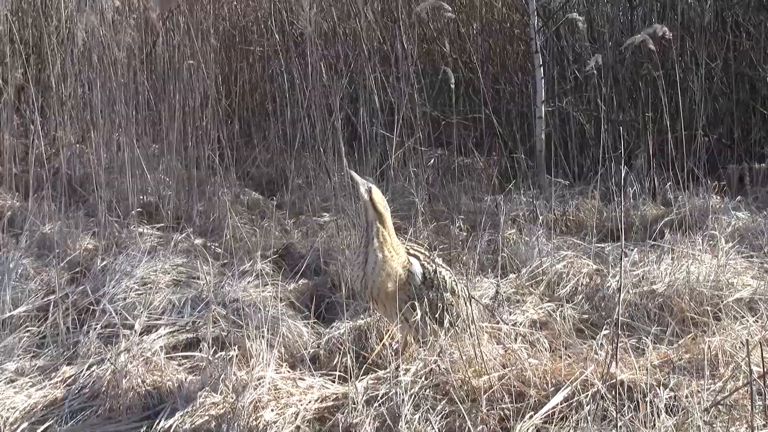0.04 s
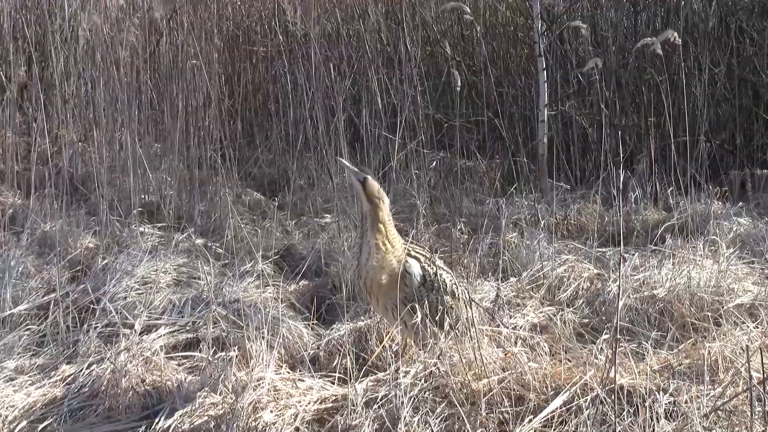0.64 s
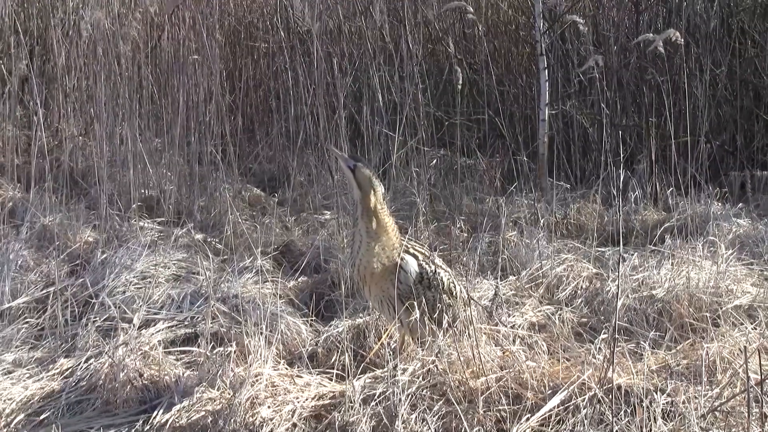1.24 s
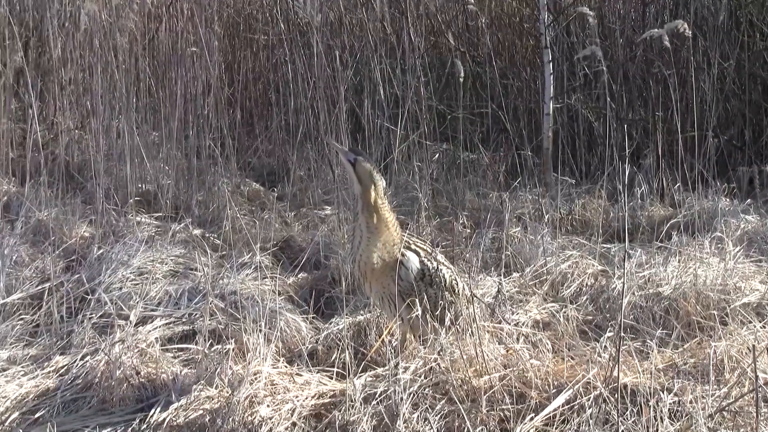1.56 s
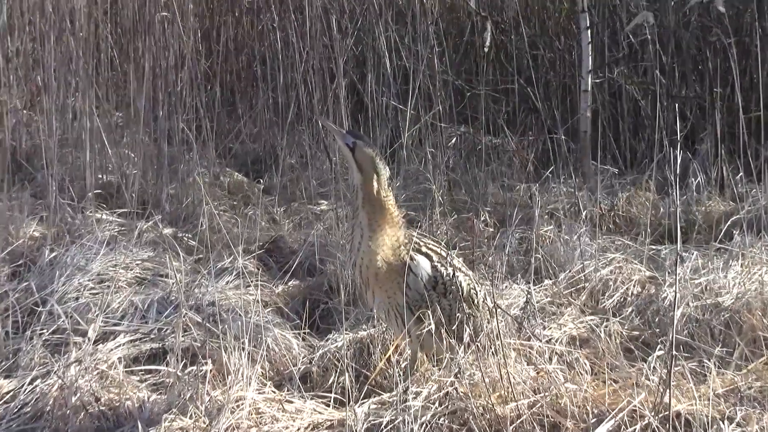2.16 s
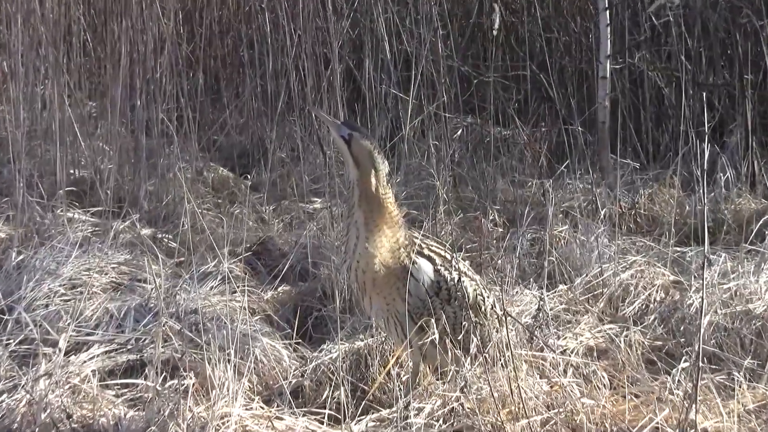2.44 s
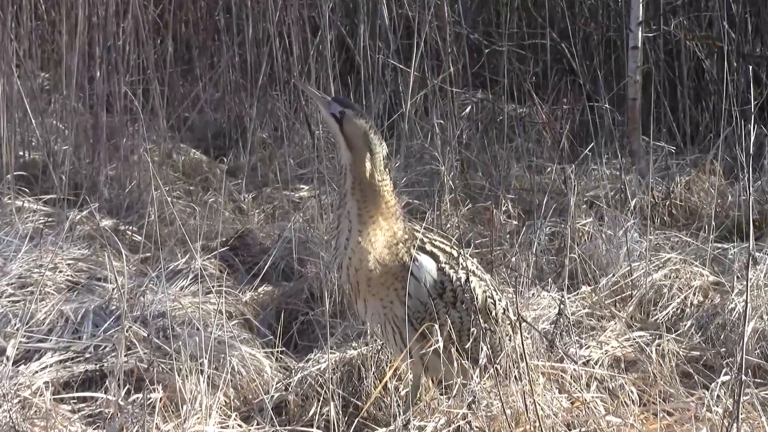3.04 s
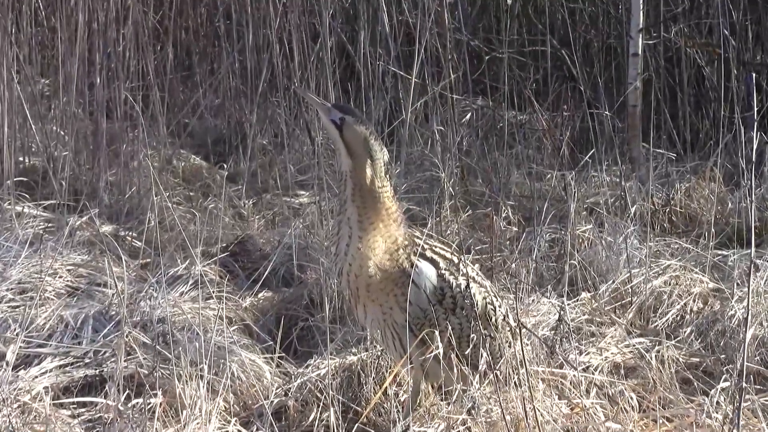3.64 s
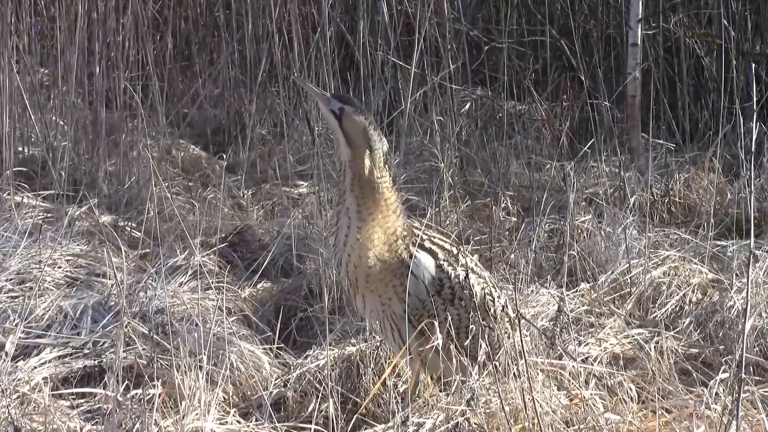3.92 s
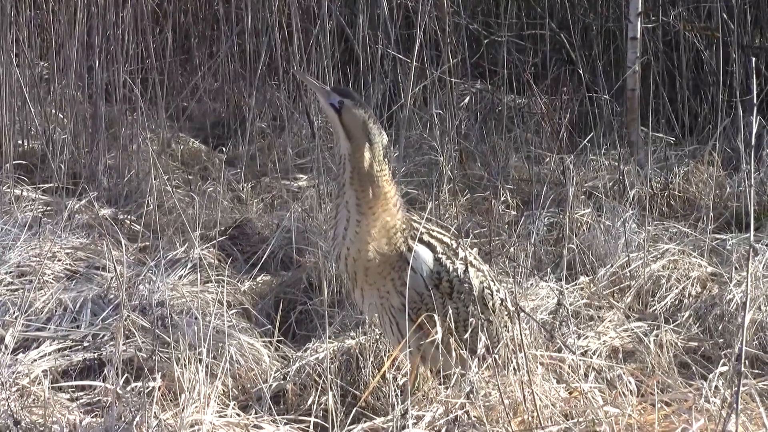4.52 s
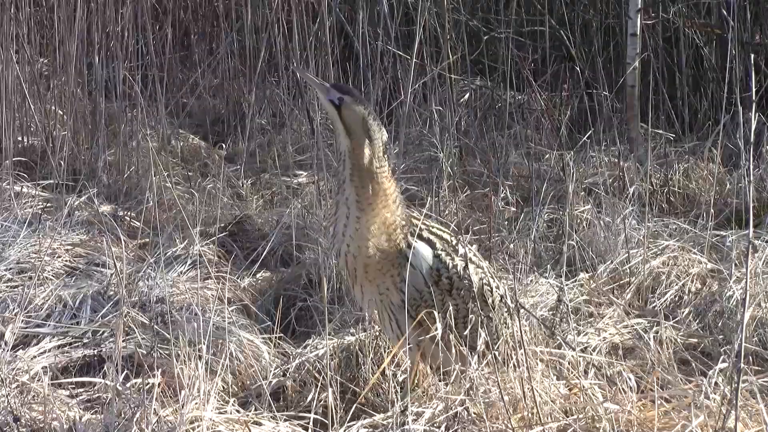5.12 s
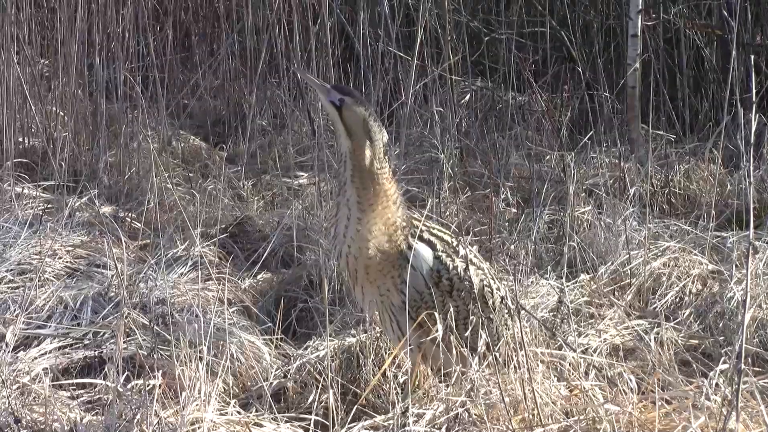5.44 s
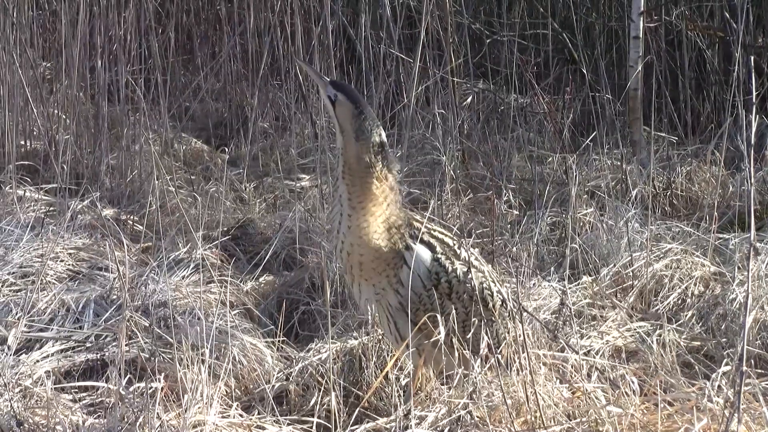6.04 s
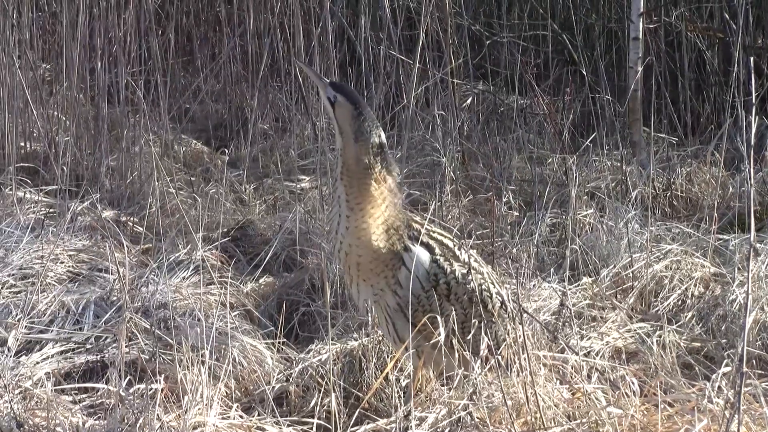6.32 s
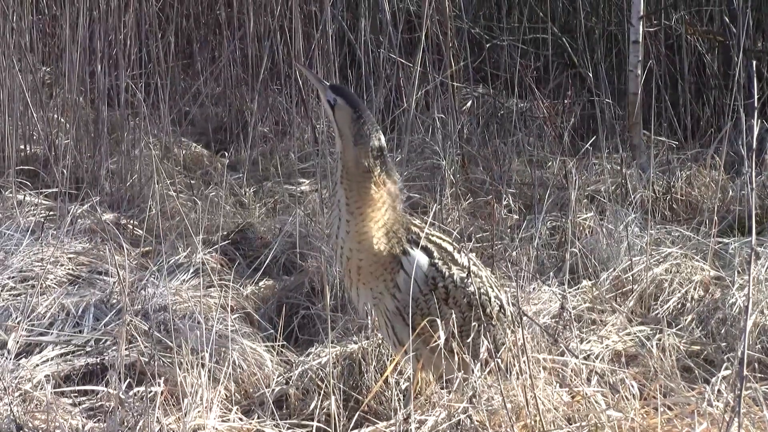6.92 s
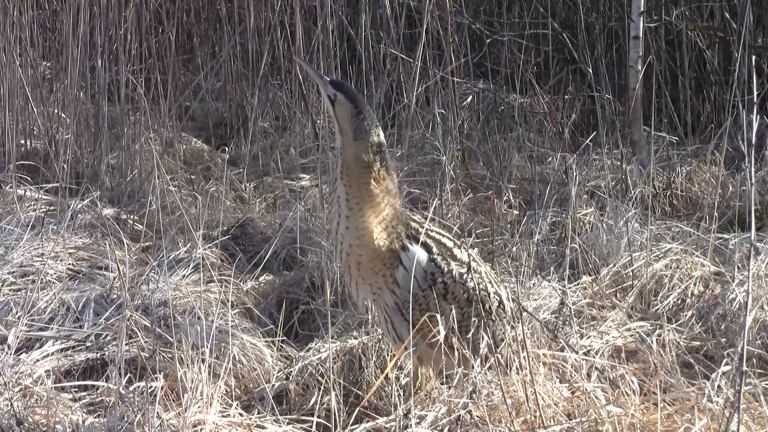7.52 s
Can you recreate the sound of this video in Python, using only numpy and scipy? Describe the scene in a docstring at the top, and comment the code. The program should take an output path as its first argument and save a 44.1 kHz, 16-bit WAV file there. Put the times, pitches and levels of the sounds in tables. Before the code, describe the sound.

Light breeze through dry reeds under faint hiss; plastic clicks and hollow knocks early on, later a sharp reed snap.

```python
"""Reed bed in light wind

Low wind eases to a lull under steadily rustling reeds, heard from a hand-held camera that hisses faintly.
Fingers work its small plastic lever and knock on its hollow shell; both ring in short-lived modes.
Dry grass ticks and reeds crack in runs of splinters. Far off, small birds whistle a few faint notes
and a thin whine swells and fades."""
import sys
import numpy as np
from scipy import signal
from scipy.fft import rfft, irfft, next_fast_len
from scipy.io import wavfile
from scipy.ndimage import uniform_filter1d

SR = 44100
rng = np.random.default_rng(int(sys.argv[2]) if len(sys.argv) > 2 else 0)


def to_wav(s):
    """Save 16-bit WAV."""
    ch = np.atleast_2d(s).T  # columns
    pcm = np.round(np.clip(ch, -1, 1) * 32767)  # PCM
    wavfile.write(sys.argv[1], SR, pcm.astype(np.int16))


N = 343098


def amp(db):
    """Decibels to gain."""
    return 10 ** (np.asarray(db) / 20)


def unit(x):
    """x at rms 1."""
    return x / np.sqrt(np.mean(x ** 2) + 1e-20)


def along(points, hz):
    """Read a curve of (f/Hz, value) points on a log frequency axis."""
    f, v = np.transpose(points)
    return np.interp(np.log(hz + 1), np.log(f + 1), v)


def filtered(x, response):
    """EQ x with a gain given as a function of frequency."""
    size = next_fast_len(x.shape[-1] + SR // 2)
    gain = response(np.fft.rfftfreq(size, 1 / SR))
    return irfft(rfft(x, size) * gain, size)[..., :x.shape[-1]]


def low_cut(x, hz):
    """A small body radiates little below hz."""
    return signal.sosfilt(signal.butter(2, hz, "high", fs=SR, output="sos"), x)


def add(track, s, sound):
    """Mix a sound into the track from time s."""
    part = track[:, round(s * SR):][:, :sound.shape[-1]]
    part += sound[..., :part.shape[-1]]


def panned(x, left_db):
    """A mono sound, louder on the left by left_db."""
    return x * amp([[left_db / 2], [-left_db / 2]])


def impulse(spectrum, size=1024):
    """The tightest click with this EQ curve (minimum phase)."""
    magnitude = amp(along(spectrum, np.fft.rfftfreq(size, 1 / SR)))
    cepstrum = irfft(np.log(magnitude))
    causal_fold = 1 + np.sign(np.fft.fftfreq(size))
    return irfft(np.exp(rfft(cepstrum * causal_fold)))


def ring(modes, tilt_db, skew_rad):
    """Struck modes die away, tilted by tilt_db per octave, with left and right skew_rad out of phase."""
    t = np.arange(SR // 5) / SR
    phase = np.array([[skew_rad], [-skew_rad]]) / 2
    out = np.zeros((2, len(t)))
    for hz, t60, left_db, right_db in modes:
        level_db = np.array([[left_db], [right_db]]) + tilt_db * np.log2(hz / 2000) + rng.normal(0, 1)
        out += amp(level_db - 60 * t / t60) * np.sin(2 * np.pi * hz * t + phase)
    attack = 1 - np.exp(-t / 0.00014)
    return out * attack


def scatter(x, t60, length_s=0.5):
    """A diffuse reverb tail at about unity gain, different in each channel."""
    t = np.arange(int(length_s * SR)) / SR
    tail = rng.standard_normal((2, len(t))) * amp(-60 * t / t60)
    return signal.fftconvolve(x, tail / np.linalg.norm(tail[0]), axes=1)[:, :x.shape[-1]]


# Stereo width of the noise beds: f/Hz, side minus mid/dB
BED_WIDTH = [(60, -5.5), (110, -3.5), (200, 3.5), (380, 6.5), (700, 4.5), (1290, 0.5), (2380, -2),
             (4400, -4), (8120, -1), (15000, -1)]

def rush(spectrum, patchy_db=1.0, side_db=0.5):
    """A stereo noise bed of rms 1 whose gain wavers in patches across time and frequency."""
    def mid_side_eq(hz):
        angle = np.arctan(amp(along(BED_WIDTH, hz) + side_db))
        return amp(along(spectrum, hz)) * np.array([np.cos(angle), np.sin(angle)])

    bins = signal.stft(rng.standard_normal((2, N)), nperseg=512)[2]
    patches = uniform_filter1d(rng.standard_normal(bins.shape[1:]), size=6, axis=0)
    patches = unit(uniform_filter1d(patches, size=18, axis=1))
    noise = signal.istft(bins * amp(patchy_db * patches), nperseg=512)[1][:, :N]
    mid, side = filtered(noise, mid_side_eq)
    return unit(np.array([mid + side, mid - side]))


# Low body of the wind: f/Hz, relative level/dB
WIND_EQ = [(20, -18), (60, -15), (110, -9), (170, -4), (260, 0.5), (390, -0.5), (650, -9.5), (1500, -33.5)]

def wind(breeze_db=-48.5, lull_db=-54, ease_start_s=1.96, ease_s=2.9):
    """A low breeze blows, then eases into a lull."""
    level_db = np.interp(np.arange(N) / SR, [ease_start_s, ease_start_s + ease_s], [breeze_db, lull_db])
    return amp(level_db) * rush(WIND_EQ, patchy_db=1.06)


# Soft midrange of the rustle: f/Hz, relative level/dB
RUSTLE_EQ = [(150, -26), (350, -2), (520, 0.5), (830, -1.5), (1200, -5.5), (2100, -11), (4700, -17.5),
             (8000, -30), (15000, -33)]

def reed_rustle():
    """Reeds rustle steadily in the wind."""
    return amp(-50) * rush(RUSTLE_EQ)


# Bright noise floor: f/Hz, relative level/dB
HISS_EQ = [(500, -3.5), (3000, -2.5), (6000, 2.5), (10000, -1), (16000, -3.5)]

def microphone_hiss():
    """The microphone's own faint, even hiss."""
    return amp(-60) * rush(HISS_EQ)


# Plastic snap, the attack of both lever and knocks: f/Hz, relative level/dB
SNAP_EQ = [(100, -17), (600, 5), (1300, 5), (2200, -1), (3000, 1), (4500, 1.5), (5700, -4), (7200, -13.5),
           (10000, -14), (15000, -18.5)]
# Ring of the lever: f/Hz, t60/s, left level/dB, right level/dB
LEVER_MODES = [(840, 0.032, -6, -4.5), (1145, 0.017, -2, -1), (1680, 0.015, -4.5, -7),
               (2070, 0.032, -11, -11), (2450, 0.015, -7.5, -7), (3550, 0.0092, -6.5, -7),
               (5250, 0.0031, -25, -14), (7300, 0.0041, -22, -18), (8700, 0.0048, -24.5, -23)]
# Lever hits: t/s, level/dB, brightness/(dB per octave)
LEVER_HITS = [(0.2542, -46.5, -10), (0.2978, -31, 3), (0.2988, -23.5, 5.5), (0.3025, -18.5, 6),
              (0.3076, -27, 6), (0.3109, -35, 0), (4.427, -37.5, 0.5)]

def lever():
    """The plastic lever chatters against its stops: each contact clicks and rings."""
    out = np.zeros((2, N))
    for s, db, bright_db in LEVER_HITS:
        clack = amp(db) * ring(LEVER_MODES, tilt_db=bright_db, skew_rad=0.16)
        add(out, s, clack + amp(-10) * scatter(clack, t60=0.026))
        click = scatter(impulse(SNAP_EQ)[None], t60=0.0042)
        add(out, s, amp(db + 14) * click)
    return low_cut(out, hz=180)


# Hollow ring of the camera's shell: f/Hz, t60/s, left level/dB, right level/dB
SHELL_MODES = [(156, 0.1, -21.5, -18), (330, 0.054, -17, -18), (383, 0.042, -7, -3.5),
               (488, 0.026, -21, -8), (580, 0.036, -13, -10), (637, 0.046, -30, -3.5),
               (790, 0.029, -0.5, -7.5), (865, 0.016, -29, -10), (1220, 0.027, -15, -19),
               (1400, 0.016, -17, -11), (1675, 0.032, -23, -15)]
# Finger hits: t/s, thud level/dB
FINGER_HITS = [(0.2687, -34.5), (0.458, -43.5), (0.584, -34), (0.588, -35.5), (0.6656, -19), (1.2617, -16),
               (2.375, -49), (5.70, -44)]

def knocks(hard_hit_db=-15.5):
    """Fingers hit the shell: a snap to the right, a hollow thud. Soft hits are duller and barely snap."""
    out = np.zeros((2, N))
    snap = panned(low_cut(impulse(SNAP_EQ), hz=300), left_db=-7.5)
    for s, db in FINGER_HITS:
        force_db = db - hard_hit_db
        shell = ring(SHELL_MODES, tilt_db=0.12 * force_db, skew_rad=0.93)
        thud = low_cut(amp(db) * shell, hz=182)
        add(out, s, thud + amp(-14) * low_cut(scatter(thud, t60=0.3), hz=99))
        add(out, s, amp(3.5 + 1.65 * force_db) * snap)
    return out


# Crisp top of a grass tick: f/Hz, relative level/dB
TICK_EQ = [(1000, -28), (4000, -2), (8000, 5), (15000, -3.5)]
# Tick cues: t/s, level/dB
TICK_CUES = [(0.383, -35), (1.772, -30), (7.254, -36)]

def grass_ticks():
    """Thin dry grass gives single bright clicks on the right."""
    out = np.zeros((2, N))
    for s, db in TICK_CUES:
        add(out, s, amp(db) * panned(impulse(TICK_EQ), left_db=-12))
    return out


# Whistles: t/s, length/s, f/Hz, upward scoop/fraction of f, level/dB
BIRD_NOTES = [(0.5, 0.08, 3040, 0, -55.5), (1.295, 0.064, 4360, 0.078, -55.5),
              (1.448, 0.058, 4330, 0.068, -56), (7.559, 0.04, 4640, 0, -63)]

def birds(scoop_s=0.018, sag_hz_per_s=1750):
    """Pure notes, some scooping up at first, sag in pitch and echo from the edge of the wood."""
    out = np.zeros((2, N))
    for s, length, hz, scoop, db in BIRD_NOTES:
        t = np.arange(int(length * SR)) / SR
        scoop_left = np.maximum(1 - t / scoop_s, 0)
        pitch = hz * (1 - scoop * scoop_left) - sag_hz_per_s * t
        tone = np.sin(2 * np.pi * np.cumsum(pitch) / SR)
        note = panned(amp(db) * signal.windows.tukey(len(t), 0.5) * tone, left_db=-3)
        add(out, s, note)
        add(out, s + 0.042, amp(-13) * note)  # slapback
    return out + amp(-11) * scatter(out, t60=0.45)


# Narrow band of the whine: f/Hz, relative level/dB
WHINE_EQ = [(900, -50), (1300, -2), (1450, -2), (1650, -9), (2200, -50)]

def whine(peak_s=0.637, peak_db=-55.5, rise_db_per_s=320, fade_db_per_s=26):
    """A far-off band of noise swells quickly and fades slowly."""
    t = np.arange(N) / SR - peak_s
    level_db = peak_db + np.minimum(rise_db_per_s * t, -fade_db_per_s * t)
    return amp(level_db) * rush(WHINE_EQ, patchy_db=-0.5, side_db=-4)


# Colour of a splintering reed wall: f/Hz, relative level/dB
SPLINTER_EQ = [(100, -25), (350, -6), (800, -3), (1600, -8), (2500, 0), (3800, -7), (5400, -2), (6800, -19),
               (9000, -12), (11500, -21), (15000, -30)]
# Crack cues: t/s, first splinter's level/dB
CRACK_CUES = [(4.428, -31), (5.286, -31), (5.3115, -6.5), (6.464, -26)]

def reed_cracks(splinters=4, gap_s=0.00087, loss_db=8):
    """A dry reed cracks in a quick run of ever weaker splinters."""
    out = np.zeros((2, N))
    for s, db in CRACK_CUES:
        for k in range(splinters):
            splinter = panned(amp(db - loss_db * k) * impulse(SPLINTER_EQ), left_db=-2)
            add(out, s + gap_s * k, splinter + amp(1.5) * scatter(splinter, t60=0.014))
    return out


def scene():
    """The stereo mix: noise beds, close handling and the life of the reed bed."""
    beds = wind() + reed_rustle() + microphone_hiss()
    return beds + lever() + knocks() + grass_ticks() + birds() + whine() + reed_cracks()


def record(dry, start_s=0.077, top_hz=15850):
    """The camera opens with a small DC offset that drains away, and passes nothing above top_hz."""
    t = np.arange(N) / SR - start_s
    offset = 0.0025 * np.exp(-np.abs(t) / 0.34)
    opened = (t > 0) * (dry + offset)
    return filtered(opened, lambda hz: hz < top_hz)


dry = scene()
out = record(dry)
to_wav(out)
```